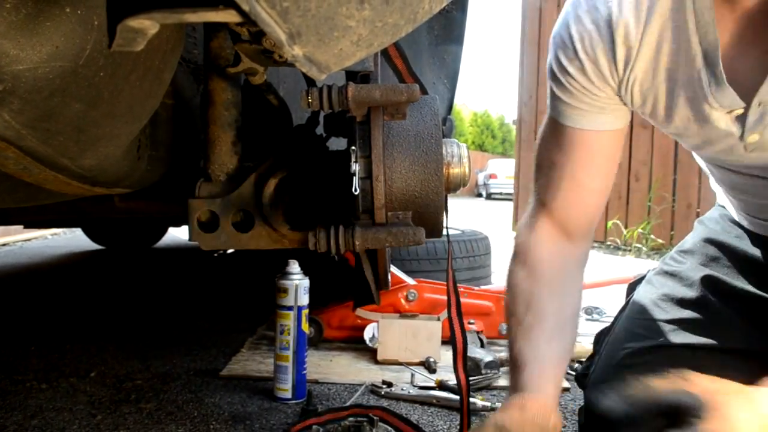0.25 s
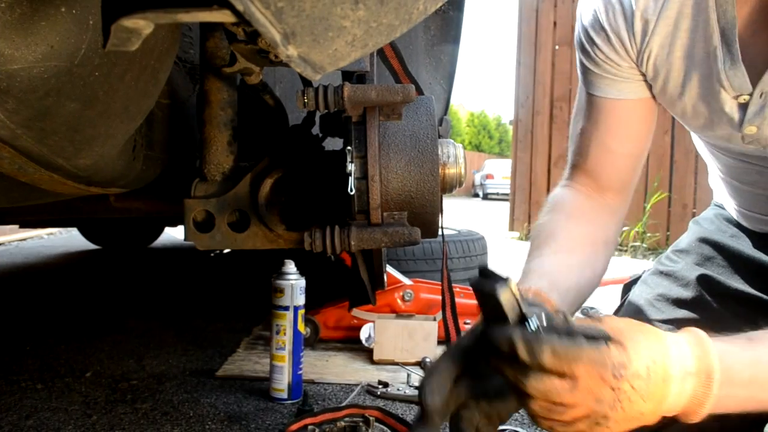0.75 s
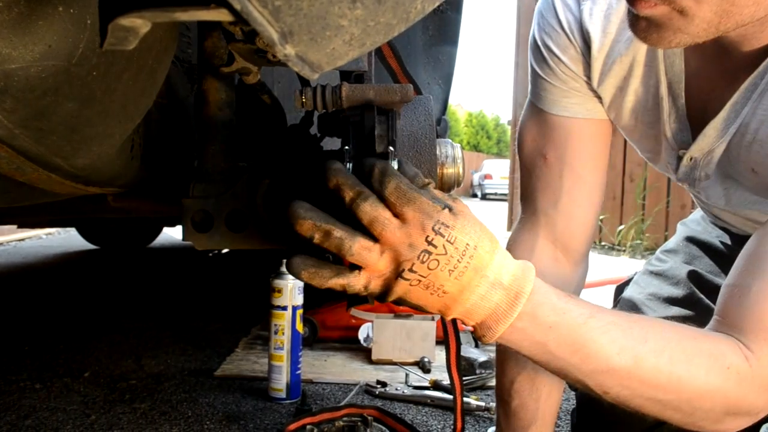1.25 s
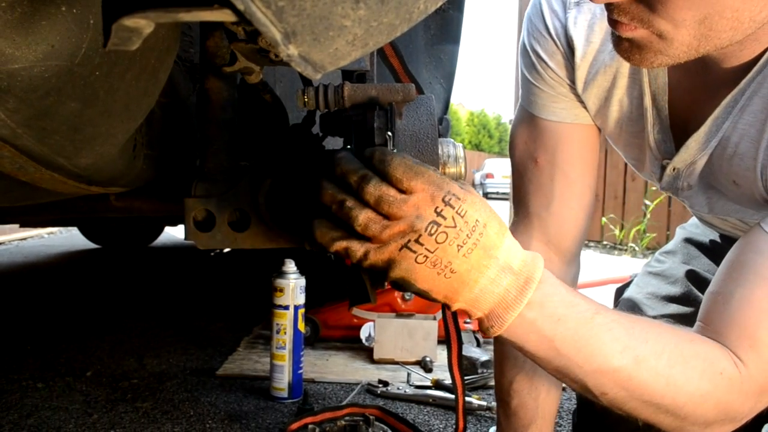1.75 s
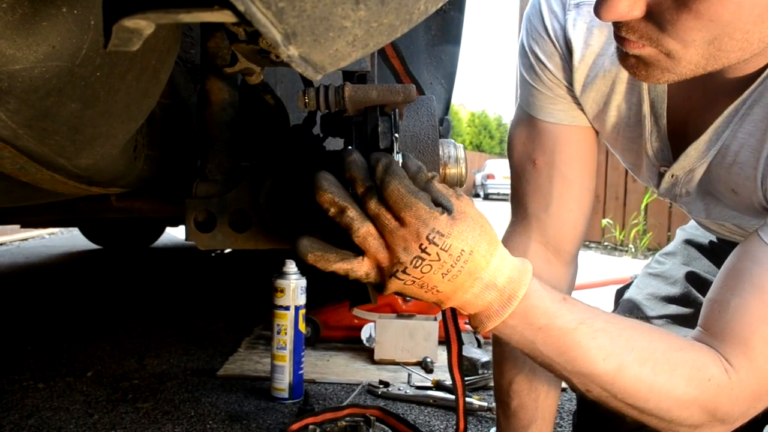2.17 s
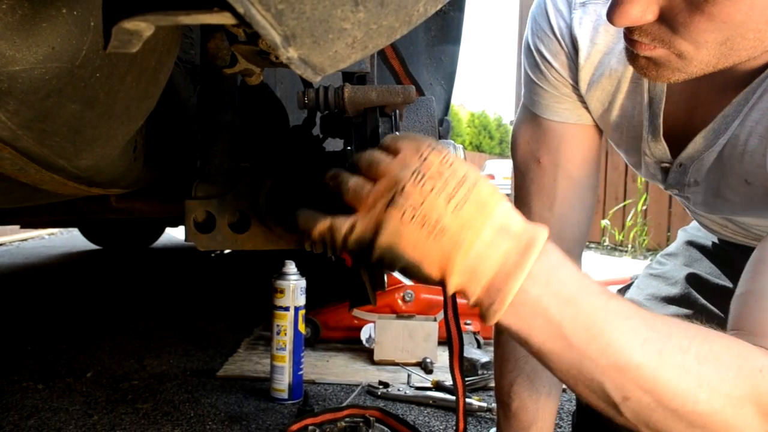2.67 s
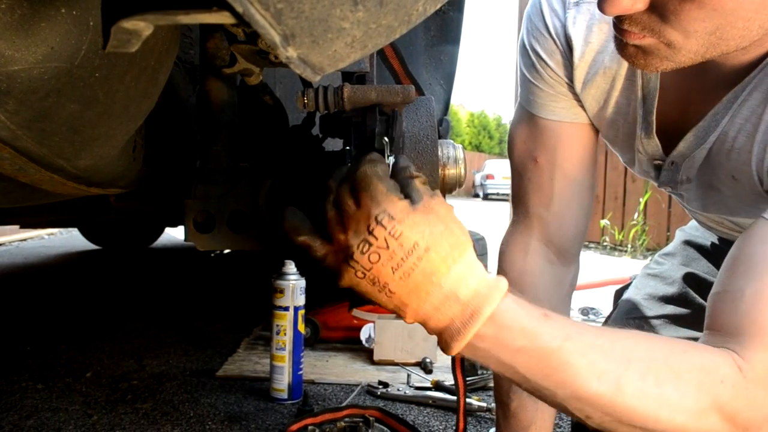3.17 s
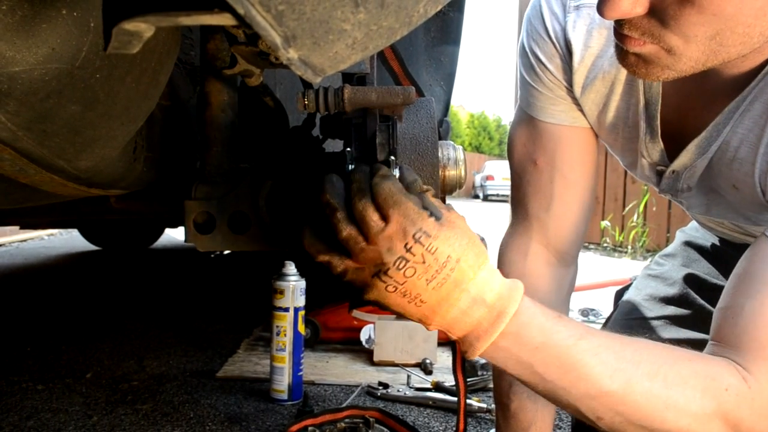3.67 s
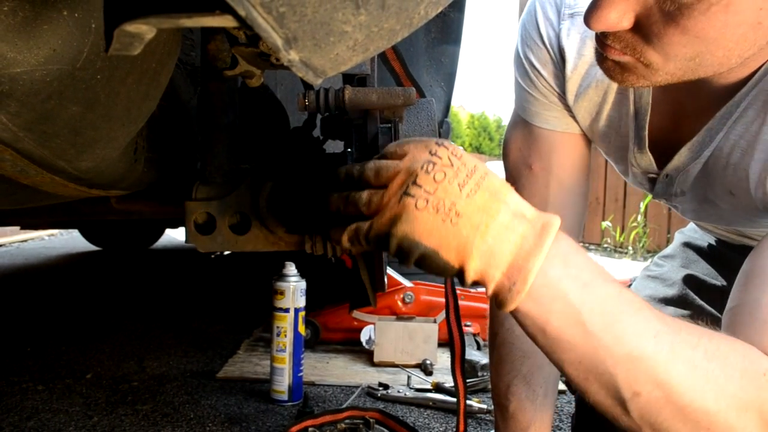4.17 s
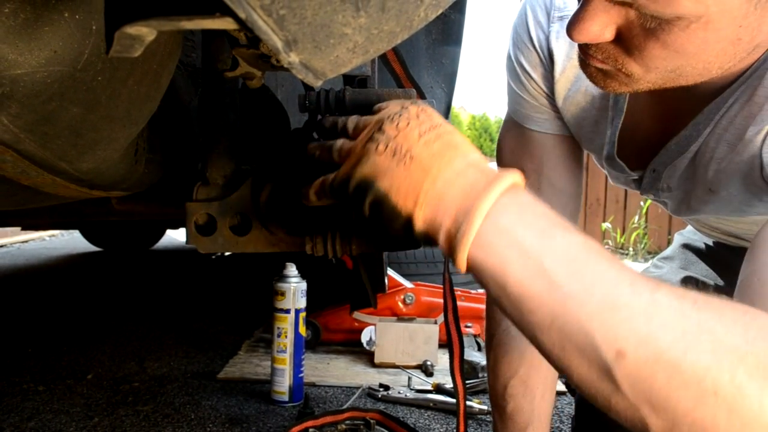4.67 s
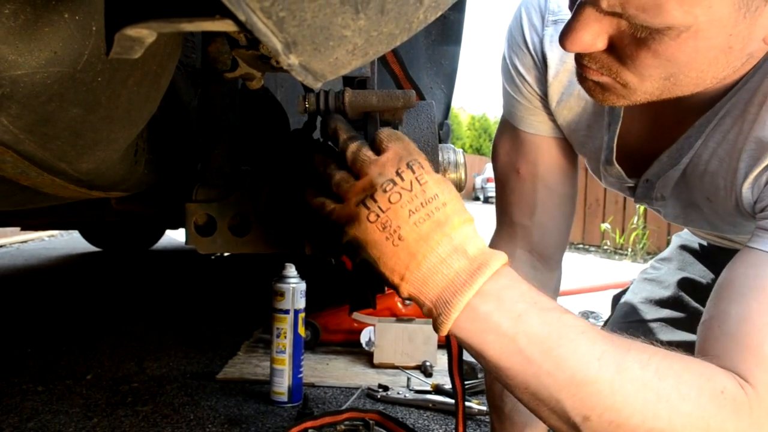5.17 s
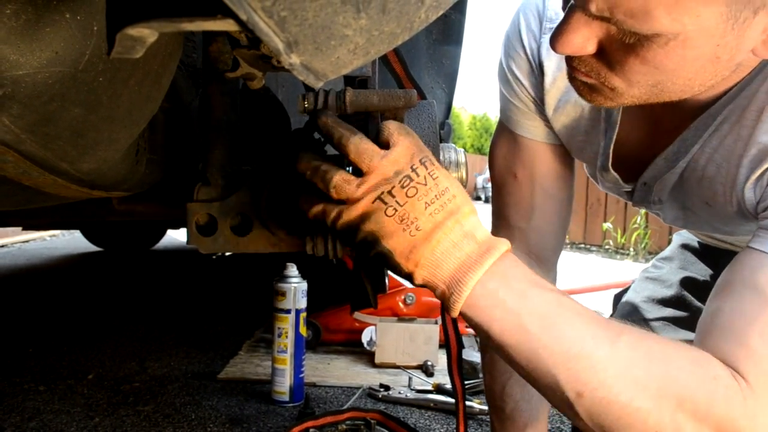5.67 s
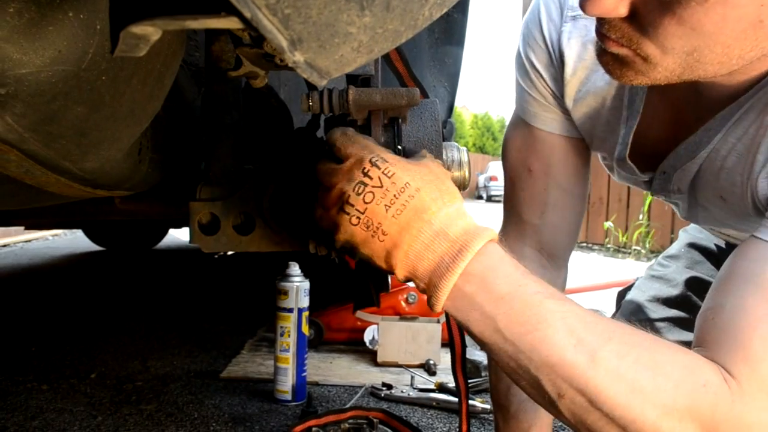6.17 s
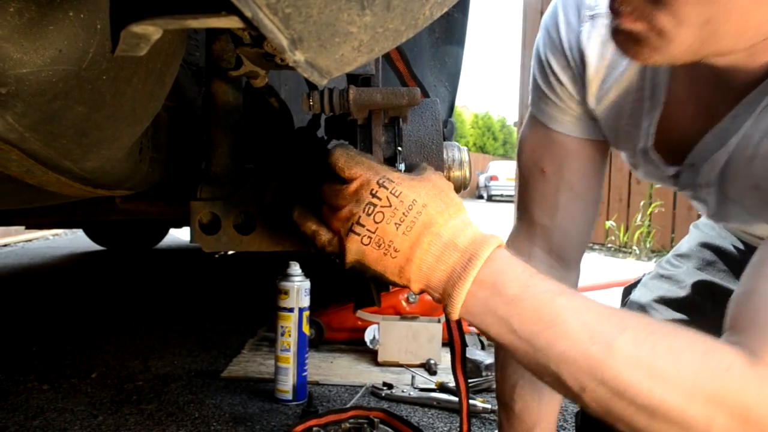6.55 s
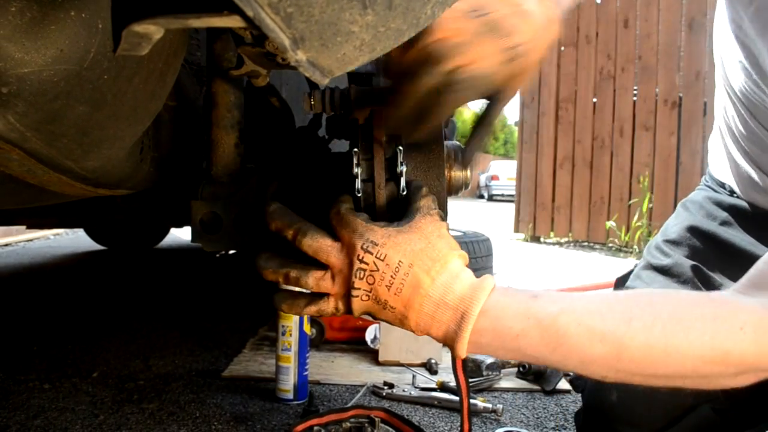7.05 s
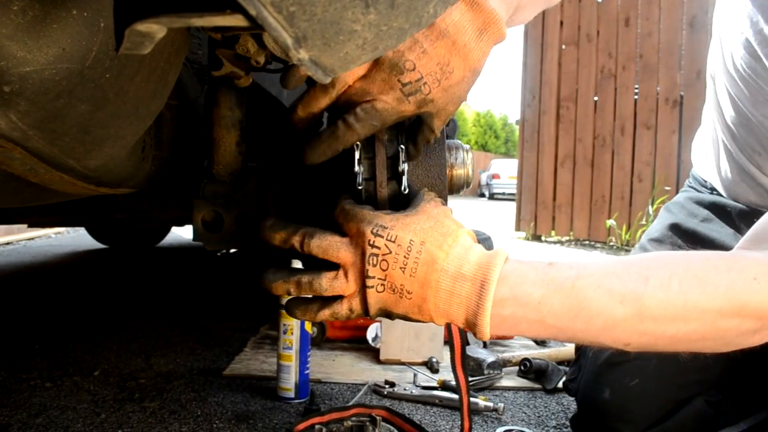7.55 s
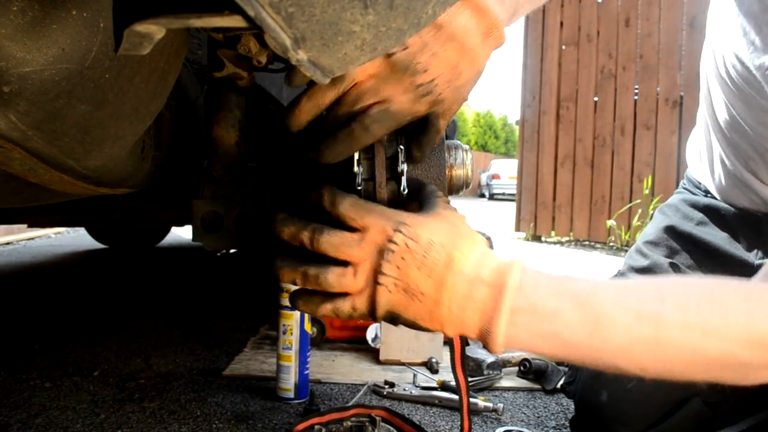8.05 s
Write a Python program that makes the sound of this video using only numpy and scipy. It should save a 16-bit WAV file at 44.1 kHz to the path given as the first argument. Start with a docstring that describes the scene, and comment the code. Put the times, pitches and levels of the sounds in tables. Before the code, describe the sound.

Close, dry outdoor sound at a car wheel on a driveway, with slight wheel-arch echo, steady soft town hiss, light wind puffs and birds whistling. For the first second only gloves rustle and tick faintly on steel. At 1.1 s a clip catches in three quick bright scrapes, then a plate clinks at 1.2 and a dull knock follows at 1.3. Firm carrier knocks come at 1.9 and 2.1, then a quiet gap. Soft gritty knocks run from 3.2 to 3.8. Stronger clunks and clinks land at 4.6 to 5.0, with a clear clink at 5.4. At 5.7 a hard, very loud crack snaps and a thin metal shield rings. Lighter taps follow until 6.4, amid lively bird chirps. Gloves rustle near 6.7; a muted push thumps at 7.3, a fainter one at 7.6, and small ticks close by 8.3.

```python
"""Over smooth town hiss (shaped noise) light wind puffs on the microphone and gloves rustle (swelling noise) and
tick on steel; birds sing (gliding sines). A spring clip catches in bright scrapes, then the backing plates of
brake pads clink and the cast caliper carrier knocks dully (decaying modes) as gloved hands work on a driveway.
Late on, the clip snaps hard with a crack and a ringing shield, and soft pushes seat the pads (damped modes)."""
import sys
import numpy as np
from scipy import signal
from scipy.fft import rfft, irfft, next_fast_len
from scipy.io import wavfile
from scipy.ndimage import uniform_filter1d, map_coordinates

SR = 44100
rng = np.random.default_rng(int(sys.argv[2]) if len(sys.argv) > 2 else 0)


def output_pcm(signal):
    """Save a mono or channel-first signal as 16-bit PCM at the path in sys.argv[1].

    Samples are clipped to [-1, 1] before scaling.
    """
    pcm = np.clip(np.atleast_2d(signal).T, -1, 1) * 32767
    wavfile.write(sys.argv[1], SR, np.round(pcm).astype(np.int16))


def gain_from_db(level_db):
    """Convert decibel levels to linear amplitude factors (20 dB per decade)."""
    decades = np.asarray(level_db, float) / 20
    return 10 ** decades


N = 366471  # samples


def unit(x):
    """Normalisation: the signal scaled to rms 1."""
    return x / np.sqrt(np.mean(x ** 2) + 1e-20)


def along(points, hz):
    """Spectral envelope: (Hz, value) points joined by straight lines on a log-frequency axis."""
    f, v = np.transpose(points)
    return np.interp(np.log(hz + 1), np.log(f + 1), v)


def bell(hz, centre_hz, fall_db):
    """Broad resonance: gain falls by fall_db one octave from the centre, as the square of the octaves."""
    return gain_from_db(-fall_db * np.log2((hz + 1) / centre_hz) ** 2)


def decay(t, level_db, t60):
    """Exponential damping: the level falls by 60 dB in t60 seconds."""
    return gain_from_db(level_db - 60 * t / t60)


def wobble(rate):
    """Random modulation: a smooth curve through normal knots, rate of them a second."""
    knots = rng.standard_normal(N // 100)
    return map_coordinates(knots, [np.arange(N) * rate / SR])


def noise(size, gain):
    """Spectral shaping: white noise filtered by a gain of frequency, then scaled to rms 1."""
    m = next_fast_len(size)
    spectrum = rfft(rng.standard_normal(m)) * gain(np.fft.rfftfreq(m, 1 / SR))
    return unit(irfft(spectrum, m)[:size])


def add(track, s, sound):
    """Superposition: mixes a sound into the track at s seconds."""
    part = track[max(round(s * SR), 0):][:len(sound)]
    part += sound[:len(part)]


def humps(rows, rest_db, fall_db=9):
    """Power addition: a rest level plus one smooth hump per row, fall_db down at its half length."""
    t = np.arange(0, N + 64, 64) / SR
    power = gain_from_db(2 * rest_db)
    power = power + sum(gain_from_db(2 * db - 2 * fall_db * ((t - s) / half) ** 2) for s, db, half in rows)
    return np.interp(np.arange(N) / SR, t, np.sqrt(power))


def ring(modes, t, reach=((1000, 0),), hold=0, spread_db=1.5):
    """Modal synthesis: where a blow lands sets which modes it reaches; they decay once the push ends."""
    hz, db, t60 = np.transpose(modes)[:, :, None]
    level = db + along(reach, hz) + spread_db * rng.standard_normal(hz.shape)
    phase = rng.uniform(0, 2 * np.pi, hz.shape)
    envelope = decay(np.maximum(t - hold, 0), level, t60)
    return np.sum(envelope * np.sin(2 * np.pi * hz * t + phase), axis=0)


def swell(t, rise):
    """Contact mechanics: the force builds up over the rise time."""
    return 1 - np.exp(-(t / rise) ** 2)


# Spectrum of steel scraping steel: pitch_hz [Hz], density_db [dB per Hz, relative]
SCRAPE_SPECTRUM = [(1760, -44), (3000, -14), (3780, -10), (4220, 0), (5580, -11), (5850, -19), (7950, -15),
                   (8330, -3), (8670, -2), (11100, -33), (12000, -45), (15600, -75), (22000, -120)]


def scrape(t, t60):
    """Friction noise: a decaying burst with the spectrum of steel scraping steel."""
    return noise(len(t), lambda hz: gain_from_db(along(SCRAPE_SPECTRUM, hz))) * decay(t, 0, t60) / 2.5


# Spectrum of the far hiss: pitch_hz [Hz], density_db [dB per Hz, relative]
TOWN_SPECTRUM = [(20, -9), (60, -5), (130, -2), (400, -1.5), (650, -1), (1000, 0), (1350, -2), (1600, -7),
                 (2500, -10), (3400, -11), (5000, -17), (7200, -21), (7900, -33), (9000, -27), (10500, -34),
                 (12500, -60), (22000, -110)]
# Narrow bands that stand out of the hiss: pitch_hz [Hz], width_hz [Hz], level_db [dB, added share re hiss]
TOWN_BANDS = [(3040, 100, 4), (4260, 130, 3)]


def town():
    """Stationary noise: smooth far hiss with narrow resonances, its level breathing a little."""
    def gain(hz):
        bands = sum(gain_from_db(db) / (1 + (2 * (hz - c) / width) ** 2) for c, width, db in TOWN_BANDS)
        return gain_from_db(along(TOWN_SPECTRUM, hz)) * (1 + bands)
    return gain_from_db(-56.5 + .8 * wobble(3)) * noise(N, gain)


# Gusts: peak_s [s], level_db [dB, before trim], half_length_s [s]
GUSTS = [(.25, -60, .2), (.78, -53, .25), (1.5, -62, .3), (2.08, -60, .15), (4.2, -58, .2), (5.05, -57, .3)]
# Single puffs on the microphone: centre_s [s], level_db [dB, before trim], width_s [s]
PUFFS = [(.09, -44, .004), (.205, -44, .004), (.36, -46, .002), (.42, -44, .003), (.865, -44, .002),
         (1.118, -38, .003), (1.366, -28, .0018), (1.432, -42, .003), (1.58, -42, .002), (3.785, -38, .002),
         (3.935, -38, .003), (4.112, -40, .003), (4.195, -40, .002), (4.735, -46, .002), (5.05, -44, .004),
         (5.135, -44, .004), (5.19, -42, .003), (5.255, -44, .003)]


def wind():
    """Turbulent pressure: lumpy low noise follows the gusts, and puffs are single pressure pulses."""
    calm_db, wake_db, wake_s = -66, -14, .035  # light air; buffeting around each puff, re the puff
    wakes = [(s, db + wake_db, wake_s) for s, db, _ in PUFFS]
    gain = humps([*GUSTS, *wakes], calm_db)
    lumps = gain_from_db(3 * wobble(22)) * noise(N, lambda hz: bell(hz, 100, 5))
    out = gain / 2 * unit(lumps)
    t = np.arange(-SR // 20, SR // 20) / SR
    for s, level_db, width in PUFFS:
        v = t / width
        pulse = v * (3 - v * v) * np.exp(-v * v / 2)
        add(out, s + t[0], gain_from_db(level_db - 3) * pulse)
    return out


# Spectrum of rubbing cloth: pitch_hz [Hz], density_db [dB per Hz, relative]
CLOTH_SPECTRUM = [(410, -37), (700, -7), (988, -6), (1070, -9), (1380, 0), (1900, -9), (2220, -3),
                  (3570, -8), (6090, -7), (9570, -15), (12000, -40), (15600, -72), (22000, -120)]
# Gloves and sleeves moving: peak_s [s], level_db [dB, of the bright share], half_length_s [s]
STROKES = [(.08, -64, .12), (.5, -62, .06), (.63, -59, .035), (.72, -64, .04), (.87, -65, .08),
           (1.03, -60, .05), (1.09, -55, .03), (1.17, -58, .06), (1.26, -62, .04), (2.02, -68, .08),
           (2.69, -60, .06), (3.22, -64, .07), (4.25, -68, .08), (4.39, -66, .06), (4.55, -66, .08),
           (4.9, -60, .04), (5.01, -63, .05), (5.45, -66, .1), (5.62, -68, .1), (6.14, -62, .08),
           (6.44, -60, .06), (6.72, -53, .08), (6.96, -61, .12), (7.24, -59, .14), (7.5, -64, .15),
           (7.86, -64, .08), (8.11, -64, .08), (8.25, -63, .05)]


def rustle():
    """Granular friction: dense cloth grains whose bright and dull shares follow each stroke."""
    still_db, dull_db = -76, 4.2  # bright share of cloth at rest; dull share re bright
    grains = gain_from_db(1.7 * wobble(40) + 1.8 * wobble(400))
    bright = noise(N, lambda hz: gain_from_db(along(CLOTH_SPECTRUM, hz)) * (hz > 3500))
    dull = noise(N, lambda hz: gain_from_db(along(CLOTH_SPECTRUM, hz)) * (hz <= 3500))
    return humps(STROKES, still_db) * unit(grains) * (bright + gain_from_db(dull_db) * dull)


# Glove seams tick on steel: start_s [s], level_db [dB, before trim]
NICKS = [(.0944, -47), (.5172, -42), (.613, -47), (.6644, -51), (.7294, -52), (2.6794, -48), (4.14, -52),
         (4.1909, -48), (6.6074, -46), (6.8134, -46), (6.9394, -47), (6.9994, -47), (7.012, -47),
         (7.15, -50), (7.4495, -46), (7.4944, -49), (7.885, -50), (8.0144, -52), (8.1514, -44),
         (8.1693, -46), (8.2332, -43), (8.243, -46)]


def nicks():
    """Impulsive excitation: very short broad bursts, each centred at a random frequency."""
    out, t = np.zeros(N), np.arange(SR // 20) / SR
    for (s, db), centre_hz in zip(NICKS, rng.uniform(2200, 6500, len(NICKS))):
        burst = noise(len(t), lambda hz: bell(hz, centre_hz, 5) * (hz < 10500))
        add(out, s - .001, decay(t, db + 1.5, .018) * swell(t, .001) * burst)
    return out


# Echo under the wheel arch: pitch_hz [Hz], t60_s [s]
ARCH_DECAY = [(200, .25), (1500, .3), (5000, .2), (12000, .08)]


def arch(x):
    """Reverberation: convolution with a noise tail in which each frequency dies at its own speed."""
    hz, t, z = signal.stft(rng.standard_normal(SR // 2), SR, nperseg=256)
    fading = z * decay(t, 0, along(ARCH_DECAY, hz)[:, None])
    tail = signal.istft(fading, SR, nperseg=256)[1]
    late = np.pad(x, (150, 0))  # samples before the echo starts
    return signal.fftconvolve(late, tail / np.linalg.norm(tail))[:N]


def whistle(hz, db):
    """Frequency modulation: a soft-edged, slightly quavering sine along a pitch track."""
    edge = np.hanning(len(hz)) ** .3
    shake = unit(uniform_filter1d(rng.standard_normal(len(hz)), size=100))
    quaver = .008  # rms share of the pitch
    phase = 2 * np.pi * np.cumsum(hz * (1 + quaver * shake)) / SR
    return gain_from_db(db) * edge * np.sin(phase)


# All bird levels are in dB before the flutter.
# A falling call's pitch track: time_s [s], pitch_hz [Hz]; its calls: start_s [s], level_db [dB]
SWOOP = [(0, 7300), (.015, 7000), (.03, 5000), (.05, 4300), (.085, 3300)]
SWOOPS = [(.105, -68), (.34, -67), (3.365, -66), (3.565, -67), (3.778, -66), (3.98, -65), (4.185, -68),
          (4.395, -68), (7.53, -70), (7.725, -70), (7.93, -70)]
# Whistles: start_s [s], length_s [s], first_hz [Hz], last_hz [Hz], level_db [dB]
NOTES = [(1.39, .09, 7000, 6200, -70), (1.49, .08, 6900, 5900, -69), (2.33, .12, 5150, 5100, -71),
         (2.35, .21, 8300, 8100, -70), (2.41, .1, 2150, 2100, -64), (2.58, .22, 6800, 6300, -68),
         (2.79, .13, 2250, 2250, -61), (2.97, .07, 5150, 5100, -69), (3.23, .09, 2250, 2250, -63),
         (3.35, .22, 7400, 6600, -72), (3.62, .06, 1750, 1780, -63), (3.7, .07, 1850, 1950, -62),
         (3.7, .22, 6300, 5900, -72), (4.0, .2, 8400, 8100, -77), (4.7, .17, 8250, 7900, -68),
         (4.955, .155, 8050, 7950, -68), (7.0, .09, 1400, 1330, -60)]
# Repeated chips: first_start_s [s], period_s [s], length_s [s], first_hz [Hz], last_hz [Hz], level_db [dB]
TRILL = (1.6, .073, .03, 6300, 5600, -69)
# Short figures, each a shape: length_s [s], first_hz [Hz], last_hz [Hz]; repeats: start_s [s], level_db [dB]
DROP = (.018, 4600, 3600)
DROPS = [(5.175, -62), (5.33, -60), (5.475, -58), (5.615, -56)]
SLIDE = (.045, 7000, 5700)
SLIDES = [(5.21, -61), (5.31, -61), (5.385, -63), (5.51, -64), (5.585, -66), (6.045, -65)]
RISE = (.02, 2950, 3800)
RISES = [(5.905, -58), (5.96, -58), (6.025, -57), (6.08, -57), (6.14, -57)]
FALL = (.023, 3250, 2350)
FALLS = [(6.3, -59), (6.33, -59)]
# A hooked figure: delay_s [s], length_s [s], first_hz [Hz], last_hz [Hz], level_db [dB re figure]
HOOK = [(0, .014, 3700, 3900, 0), (.014, .018, 4400, 3000, -1), (.042, .022, 2800, 2400, -5)]
# Its repeats: start_s [s], level_db [dB]
HOOKS = [(6.428, -52), (6.62, -51), (6.826, -51)]
# One climbing whistle: time_s [s], pitch_hz [Hz]
CLIMB = [(3.86, 2150), (3.95, 2250), (3.96, 2450), (4.03, 2680), (4.12, 2700)]


def birds():
    """Tonal sources at a distance: gliding whistles whose level flutters on the way."""
    out = np.zeros(N)
    when, pitch = np.transpose(SWOOP)
    for s, db in SWOOPS:
        add(out, s, whistle(np.interp(np.arange(0, when[-1], 1 / SR), when, pitch), db))
    when, pitch = np.transpose(CLIMB)
    add(out, when[0], whistle(np.interp(np.arange(when[0], when[-1], 1 / SR), when, pitch), -62))
    first, period, *chip = TRILL
    notes = [*NOTES, *[(first + k * period, *chip) for k in range(10)]]
    for shape, repeats in [(DROP, DROPS), (SLIDE, SLIDES), (RISE, RISES), (FALL, FALLS)]:
        notes += [(s, *shape, db) for s, db in repeats]
    for s, db in HOOKS:
        notes += [(s + delay, length, hz0, hz1, db + rel) for delay, length, hz0, hz1, rel in HOOK]
    for s, length, hz0, hz1, db in notes:
        add(out, s, whistle(np.linspace(hz0, hz1, round(length * SR)), db))
    return out * gain_from_db(3.5 + 2.1 * wobble(60))


# The spring clip catches: start_s [s], level_db [dB, before trim]
TICKS = [(1.1258, -24), (1.1384, -25), (1.1657, -28)]


def ticks():
    """Stick and slip: bright scraping bursts, each with a small duller tap."""
    out, t = np.zeros(N), np.arange(SR // 10) / SR
    t60 = .035
    for s, db in TICKS:
        tap = noise(len(t), lambda hz: bell(hz, 1600, 8)) * decay(t, -8.5, t60)
        add(out, s - .002, gain_from_db(db + 9) * swell(t, .003) * (scrape(t, t60) + tap))
    return out


# Modes of the backing plate: pitch_hz [Hz], level_db [dB, relative], t60_s [s]
PLATE_MODES = [(824, -20, .1), (1300, -3, .07), (1450, -1, .15), (2060, 0, .2), (2975, 0, .2),
               (4180, -1, .09), (5640, -8, .14), (6611, -26, .15), (7348, -26, .15), (9280, -34, .15)]
# Backing plate struck: start_s [s], level_db [dB, first modes, before trim],
# second_db, third_db, top_db [dB re first modes]
CLINKS = [(1.2316, -22, -6, -6, -13), (1.637, -47, -3, -9, -4), (1.88, -45, -6, -6, -12),
          (1.995, -37, -14, -18, -22), (2.03, -44, -8, -2, -10), (3.5518, -33, -10, -14, -18),
          (4.7117, -26, -1, -2, -13), (5.4244, -24, -4, -7, -9), (5.655, -46, -3, -3, 5),
          (5.978, -25, -9, -2, -10), (7.8944, -56, 3, -6, -10), (8.298, -41, -5, -20, -25)]


def clinks():
    """Free vibration then damping: the loose plate rings clear until a finger or the carrier grips it."""
    out, t = np.zeros(N), np.arange(SR // 2) / SR
    contacts = np.array([row[0] for row in [*KNOCKS, *CLINKS]])
    for s, db, second_db, third_db, top_db in CLINKS:
        # free for at most .08 s; the next contact over 20 ms away may stop it sooner
        held = min([.08, *(contacts[contacts > s + .02] - s)])
        grip = decay(np.maximum(t - held, 0), 0, .05)
        reach = [(1450, 0), (2060, second_db), (2975, third_db), (4180, top_db)]
        body = grip * ring(PLATE_MODES, t, reach)
        contact = noise(len(t), lambda hz: bell(hz, 1700, 9)) * decay(t, -6, .09)
        edge = gain_from_db(top_db - 10) * scrape(t, .04)
        add(out, s - .0025, gain_from_db(db - 1.5) * swell(t, .003) * (body + contact + edge))
    return out


def chatter(x):
    """Repeated impact: the blow plus four weaker after-blows at random moments, rms kept."""
    span_s, after_db = .016, -5  # longest delay; upper limit of an after-blow re the blow
    late, size = rng.uniform(.15, 1, (2, 4))
    taps = np.bincount([0, *(late * span_s * SR).astype(int)], [1, *(gain_from_db(after_db) * size)])
    return unit(signal.fftconvolve(x, taps)[:len(x)]) * np.sqrt(np.mean(x ** 2))


# Modes of the cast carrier: pitch_hz [Hz], level_db [dB, relative], t60_s [s]
CARRIER_MODES = [(385, -23, .07), (506, -30, .6), (646, -27, .6), (708, -3, .085), (736, -4, .1),
                 (885, -10, .07), (928, -10, .14), (1071, -11, .08), (1215, -3, .075), (1250, -2, .08),
                 (1373, -8, .055), (1523, -14, .08), (1852, -6, .055), (1960, -5, .07), (2070, -6, .055),
                 (2234, -6, .07), (2580, -13, .05), (2955, -18, .06), (3550, -20, .04), (3903, -25, .04)]
# Pad against carrier: start_s [s], level_db [dB, low modes, before trim],
# mid_db, ear_db [dB re low modes], grind_db [dB re low modes, before trim]
KNOCKS = [(1.324, -23, -7, -9, -38), (1.91, -14, 2, -6, -43), (2.069, -15, -4, -9, -46),
          (2.077, -15, -12, -7, -51), (3.197, -33, -1, -10, -27), (3.214, -29, -4, -12, -32),
          (3.229, -30, -7, -14, -32), (3.602, -35, -1, -9, -30), (3.68, -29, 1, -13, -34),
          (3.779, -33, -5, -13, -28), (4.11, -47, -1, -7, -15), (4.516, -42, -2, -12, -19),
          (4.543, -30, -16, -22, -32), (4.638, -30, 4, 0, -18), (4.667, -12, -8, -5, -38),
          (4.904, -14, -9, -3, -42), (5.009, -18, -15, -19, -46), (5.363, -41, -14, -16, -23),
          (5.508, -33, -12, -21, -28), (5.654, -26, -9, -16, -21), (5.984, -32, 4, -5, -24),
          (6.172, -32, -4, -6, -22), (6.193, -27, -5, 4, -22), (6.262, -30, -4, -9, -18),
          (6.416, -29, -17, -24, -32)]


def knocks():
    """Impact on a damped casting: the pad's ears grind and seat; rough contact adds noise to the modes."""
    out, t = np.zeros(N), np.arange(SR // 2) / SR
    rise = .007
    push = swell(t, rise)
    for s, db, mid_db, ear_db, grind_db in KNOCKS:
        reach = [(980, 0), (1080, mid_db), (1600, mid_db), (1800, ear_db)]
        body = chatter(push * ring(CARRIER_MODES, t, reach, hold=1.7 * rise))
        grind = noise(len(t), lambda hz: bell(hz, 5500, 16) * (hz < 10500)) * decay(t, grind_db + 1, .08)

        def colour(hz):
            return gain_from_db(along(reach, hz)) * bell(hz, 1500, 7.5) / (1 + (hz / 3900) ** 5)
        rough = noise(len(t), colour) * decay(t, max(0, mid_db, ear_db) - 5.5, .1)
        add(out, s - .95 * rise, gain_from_db(db + .7) * (body + push * (grind + rough)))
    return out


# Spectrum of the snap's first milliseconds: pitch_hz [Hz], density_db [dB per Hz, before treble lift]
CRACK_SPECTRUM = [(24, -66), (40, -36), (397, -23), (667, -11), (943, -14), (1210, -3), (1710, -12),
                  (1980, -7), (3320, -8), (3850, 0), (5050, -15), (9140, -21), (11500, -34), (14600, -60)]
# Modes of the thin shield behind the disc: pitch_hz [Hz], level_db [dB, relative], t60_s [s]
SHIELD_MODES = [(385, -22, .17), (506, -33, 1.8), (646, -9, 0.42), (926, -10, 0.2), (996, -16, 0.31),
                (1249, -18, 0.42), (1443, -24, .7), (1523, -15, 0.2), (1976, -15, 0.4), (2331, -5, 0.1),
                (2719, -9, 0.18), (2826, -8, 0.14), (2912, -23, 0.35), (3020, -12, 0.22), (3155, -20, 0.24),
                (3241, -13, 0.16), (3505, -10, 0.15), (3655, -16, 0.28), (3747, -9, 0.18), (3844, -9, 0.21),
                (4091, 0, 0.13), (4296, -19, 0.2), (4360, -9, 0.14), (4576, -12, 0.14), (4829, -28, 0.22),
                (5120, -20, 0.14), (8495, -30, 0.15)]
# The spring clip snaps home: start_s [s], level_db [dB, before trim]
SNAP = [(5.721, 3)]


def snap():
    """Sudden energy release: a broad crack, then a duller rattle, and the thin shield rings."""
    out, t = np.zeros(N), np.arange(SR // 2) / SR
    reach = [(1000, -5), (2200, -4), (3000, -2), (4100, -4)]
    for s, db in SNAP:
        crack = noise(len(t), lambda hz: gain_from_db(along(CRACK_SPECTRUM, hz) + 3 * np.log2(hz / 4000 + 1)))
        crack = crack * decay(t, .3, .045)
        rattle = noise(len(t), lambda hz: gain_from_db(along(CRACK_SPECTRUM, hz)) / (1 + (hz / 3200) ** 3))
        rattle = rattle * decay(t, -17, .27)
        shield = gain_from_db(-10.5) * ring(SHIELD_MODES, t, reach)
        add(out, s - .0005, gain_from_db(db - 1.5) * swell(t, .0018) * (crack + rattle + shield))
    return out


def thuds():
    """Structure-borne sound: the snap and pushes shake the car, in low noise that grows with the blow."""
    out, t = np.zeros(N), np.arange(SR // 4) / SR
    for s, db in [(SNAP[0][0], SNAP[0][1] - 28), *PUSHES]:
        rumble = noise(len(t), lambda hz: bell(hz, 120, 4))
        add(out, s, decay(t, -43 + .45 * (db + 13), .2) * swell(t, .005) * rumble)
    return out


# Modes of the seated pads: pitch_hz [Hz], level_db [dB, relative], t60_s [s]
SEATED_MODES = [(161, -20, .2), (265, -15, .15), (431, -12, .12), (549, -5, .12), (603, -14, .25),
                (797, 0, .12), (894, -5, .12), (1114, -4, .12), (1249, -3, .1), (1453, -12, .08),
                (1604, -14, .08), (1900, -18, .06)]
# A hand pushes the seated pads: start_s [s], level_db [dB, relative]
PUSHES = [(6.975, -39), (7.329, -13), (7.582, -35)]


def pushes():
    """Soft impact: a blow by hand excites only low, damped modes and a dull thump."""
    out, t = np.zeros(N), np.arange(SR // 2) / SR
    rise = .004
    for s, db in PUSHES:
        thump = noise(len(t), lambda hz: bell(hz, 700, 4.5)) * decay(t, -5, .1)
        body = gain_from_db(-11) * ring(SEATED_MODES, t, hold=.008)
        add(out, s - .8 * rise, gain_from_db(db) * swell(t, rise) * (body + thump))
    return out


def scene():
    """Superposition of sources: steel and birds with their echo, then hands, air and town."""
    steel = nicks() + ticks() + clinks() + knocks() + snap() + pushes()
    song = birds()
    echo = gain_from_db(-17) * arch(steel) + gain_from_db(-7) * arch(song)
    return (town() + wind() + rustle() + steel + song + echo + thuds())[None]


def roll_off(x):
    """The treble ends steeply here."""
    return signal.sosfilt(signal.butter(12, 14760, fs=SR, output="sos"), x)


def record(dry):
    """Input limits: the signal clips at full scale and a zero-phase low-pass rolls off the top octave."""
    lowpass = signal.butter(2, 12000, fs=SR, output="sos")
    smooth = signal.sosfiltfilt(lowpass, np.clip(dry, -1, 1))
    return roll_off(np.clip(smooth, -1, 1))


dry = scene()
out = record(dry)
output_pcm(out)
```